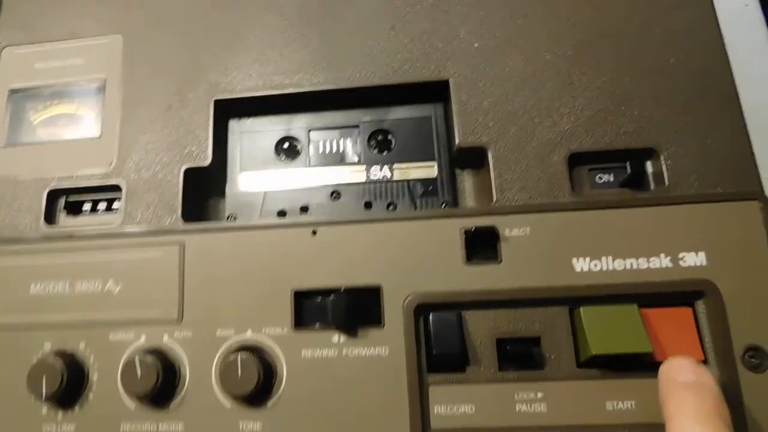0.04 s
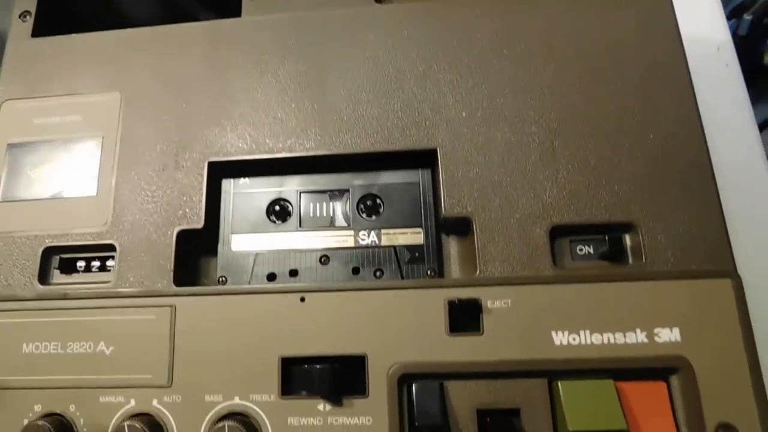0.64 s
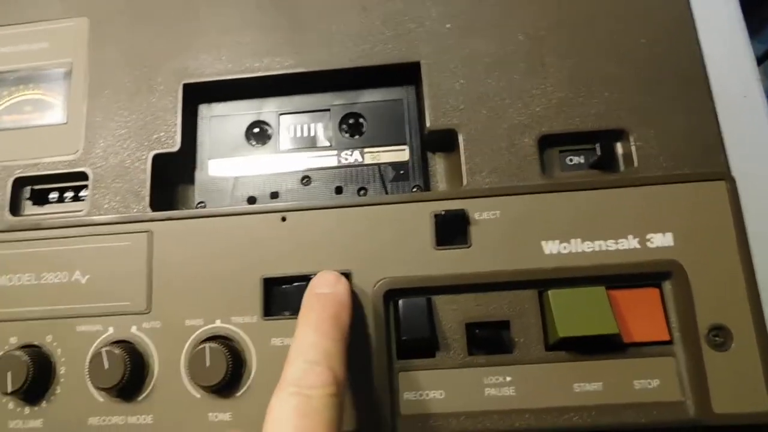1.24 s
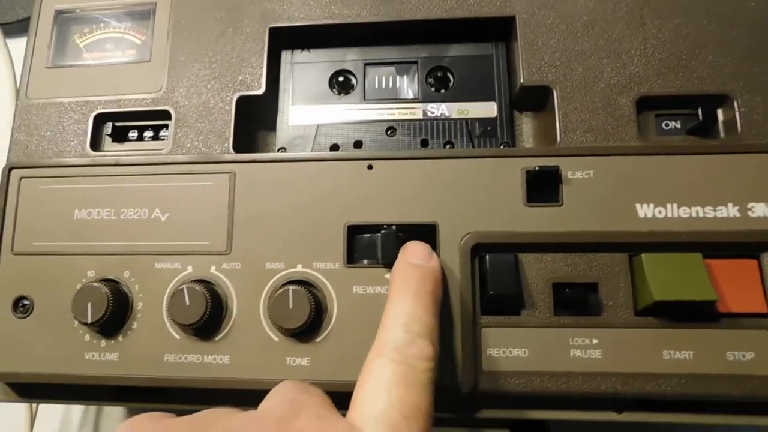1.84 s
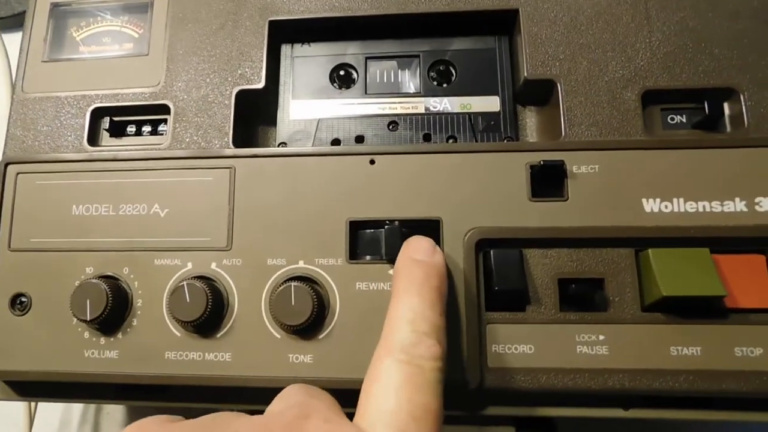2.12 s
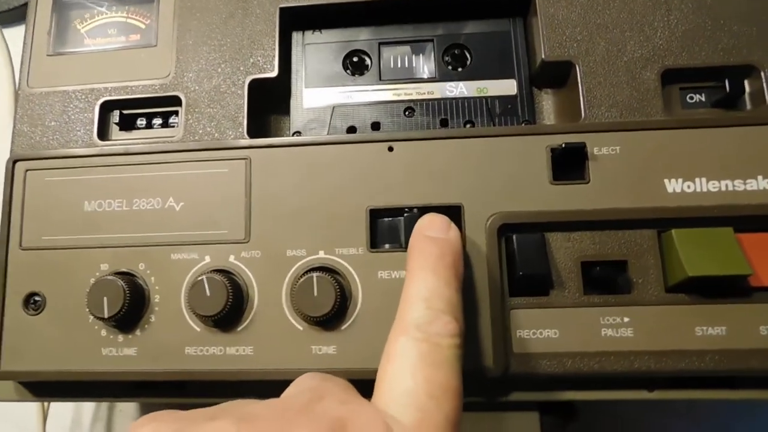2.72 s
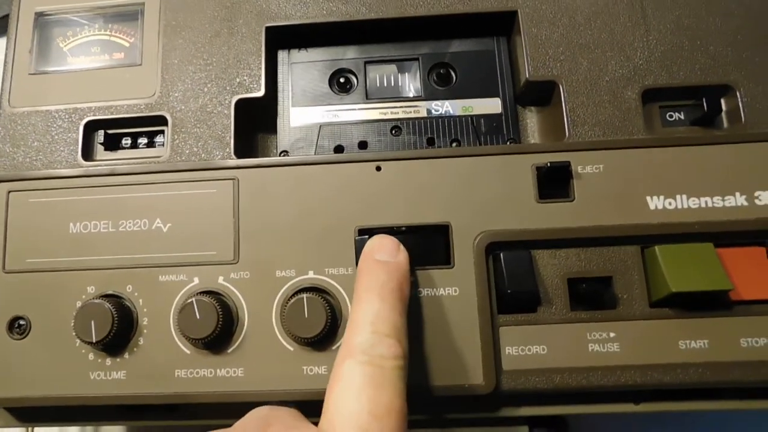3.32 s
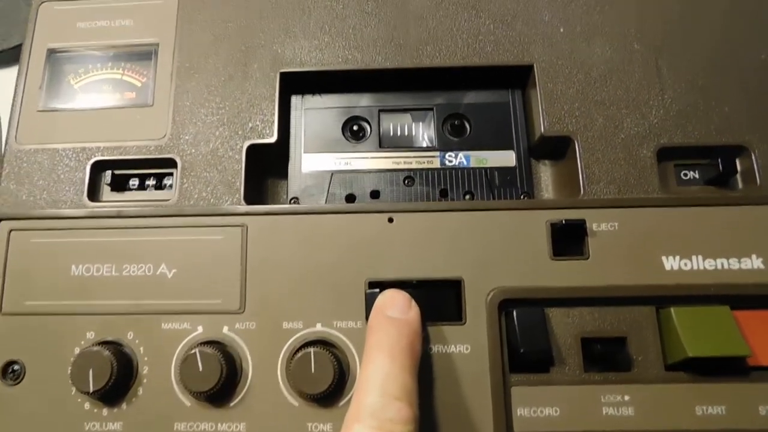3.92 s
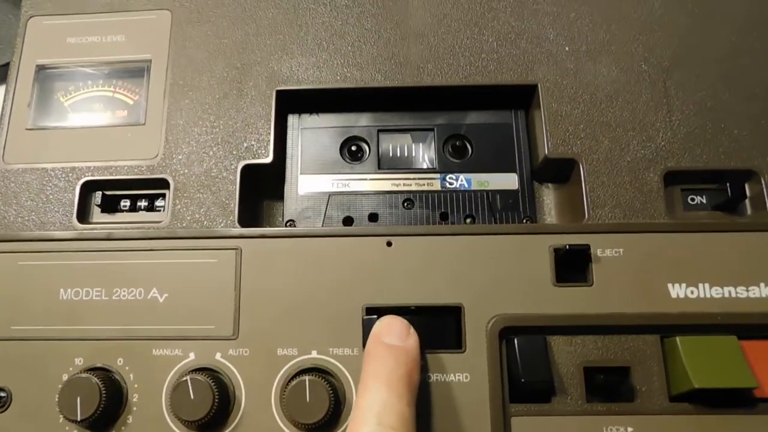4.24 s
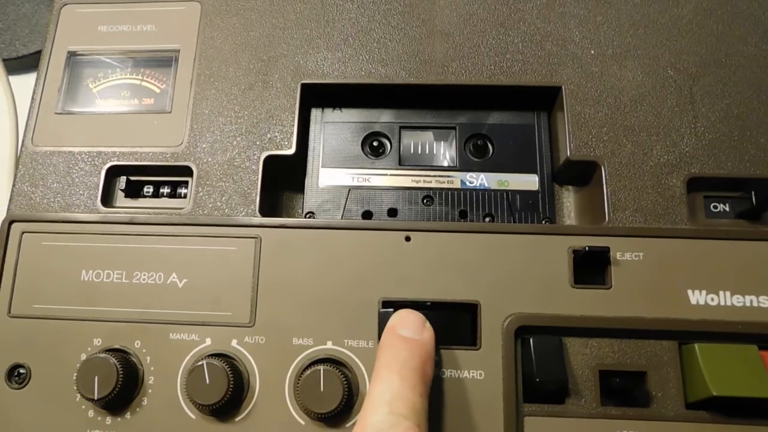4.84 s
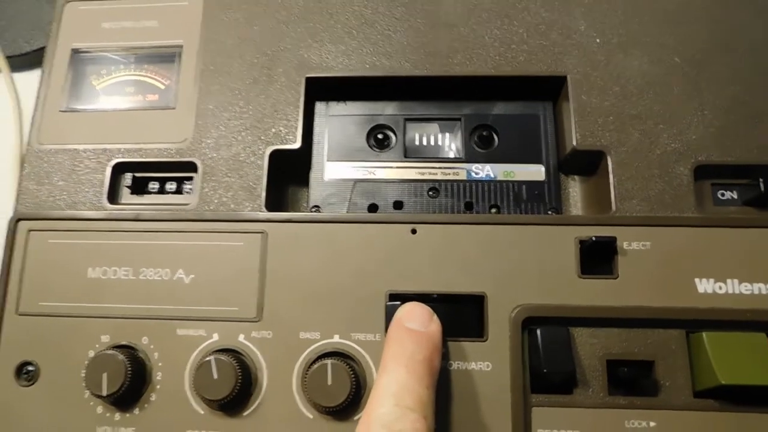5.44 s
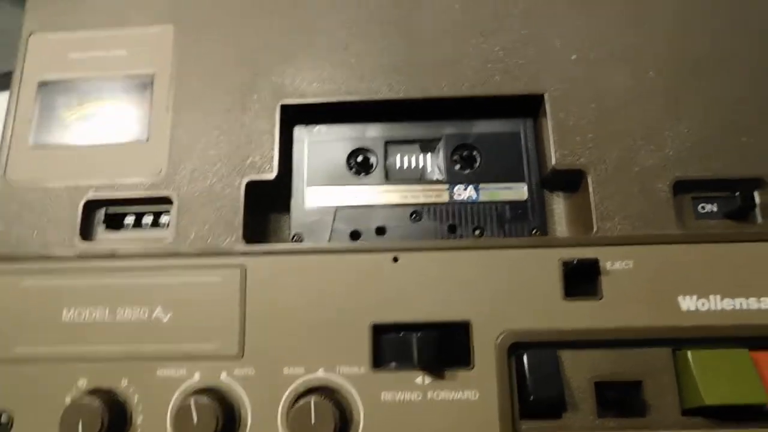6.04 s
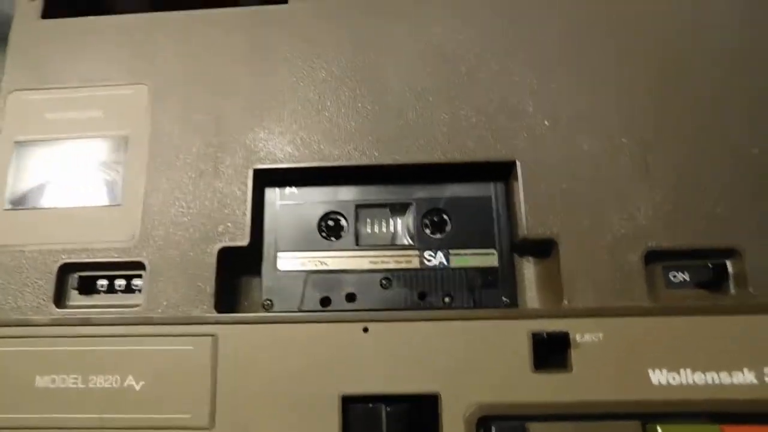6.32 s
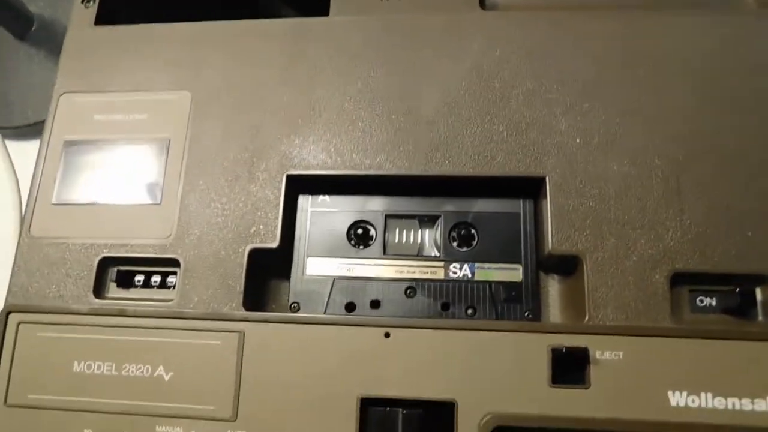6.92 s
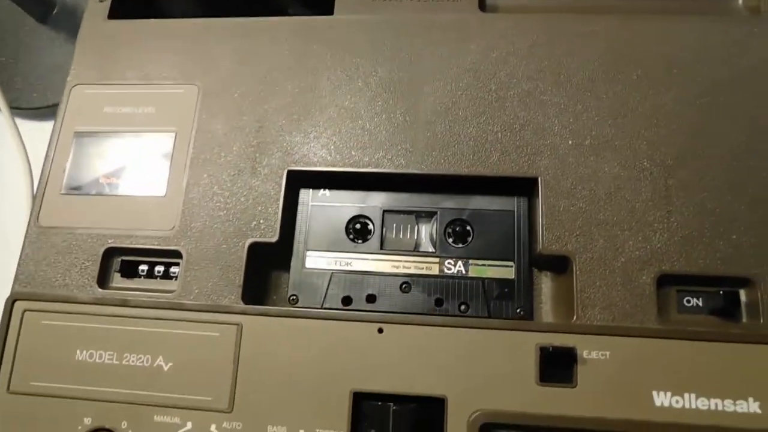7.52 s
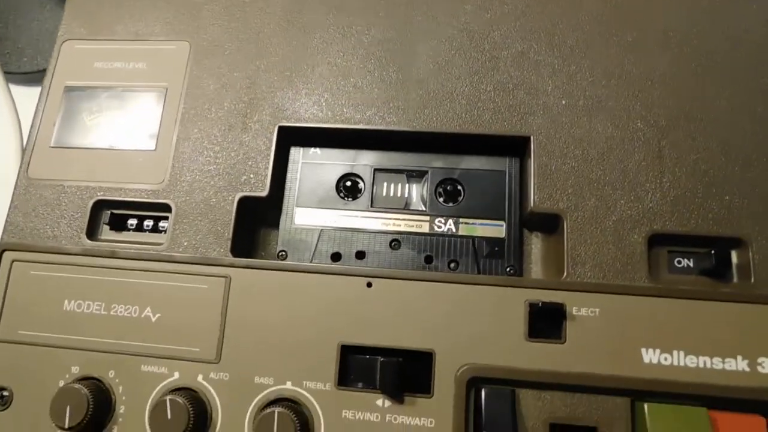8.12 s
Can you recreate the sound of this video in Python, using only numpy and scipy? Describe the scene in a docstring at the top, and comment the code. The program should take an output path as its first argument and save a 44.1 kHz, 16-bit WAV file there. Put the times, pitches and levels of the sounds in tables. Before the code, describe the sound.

Close to a cassette player in a small room, the motor hums and the drive knocks softly over faint hiss. After a few light clicks, a sharper one starts the rewind, and the reels spin up into a rasping whir for about two and a half seconds. A loud clack cuts it off as the slider is released, leaving steel springs ringing faintly over the idling mechanism.

```python
"""A cassette deck's wind slider clicks, is held in rewind, then snaps back with a loud clack.
Each contact rings the case and a small room; the clack leaves steel springs ringing.
During rewind the reels spin up, the spindle rubs and shakes the cassette shell, and the tape hisses.
Underneath, the motor hums and the drive knocks softly in the chassis, over a faint steady hiss."""
import sys
import numpy as np
from scipy import signal
from scipy.fft import rfft, irfft
from scipy.io import wavfile
from scipy.ndimage import uniform_filter1d, map_coordinates

SR = 44100
rng = np.random.default_rng(int(sys.argv[2]) if len(sys.argv) > 2 else 0)


def dump_mix(stems):
    """Bounce the given channels to the path in sys.argv[1] as a 16-bit WAV at rate SR."""
    frames = np.atleast_2d(stems).T  # one column per channel
    limited = np.clip(frames, -1, 1)  # hard clip at full scale
    pcm = np.round(limited * 32767).astype(np.int16)
    wavfile.write(sys.argv[1], SR, pcm)


N = 359856
TIME = np.arange(N) / SR
FREQS = np.maximum(np.arange(N // 2 + 1) * SR / N, 1)
SIDES = np.array([[1], [-1]])   # left, right
ENGAGE_S, RELEASE_S = 2.97, 5.519   # slider held in rewind
MOTOR_HZ = 27.657


def from_db(db):
    """Decibels to gain."""
    return 10 ** (np.asarray(db) / 20)


def unit_rms(x):
    """Scale to rms 1."""
    return x / np.sqrt(np.mean(x ** 2) + 1e-20)


def at_hz(points, hz):
    """Interpolate a table on a log-frequency axis."""
    known_hz, values = np.transpose(points)
    return np.interp(np.log(hz), np.log(known_hz), values)


def drift(rate_hz):
    """Smooth random wander, rms 1."""
    steps = rng.standard_normal(2048)
    curve = map_coordinates(steps, [TIME[::32] * rate_hz], order=3, mode="wrap")
    return unit_rms(curve).repeat(32)[:N]


def steady(x, window_samples):
    """Even out short-term power, so an envelope alone sets the loudness."""
    power = np.mean(x ** 2, axis=0)
    local_power = np.abs(uniform_filter1d(power, window_samples, mode="wrap"))
    return x * np.sqrt(power.mean() / (local_power + 1e-20))


def resonate(x, resonances):
    """Cascade of peaks and dips; overall rms is kept."""
    sections = []
    for hz, width_hz, lift_db in resonances:
        damping = np.pi * abs(width_hz) / SR
        tuning = -2 * np.cos(2 * np.pi * hz / SR)
        lifted = damping * from_db(lift_db)
        biquad = np.array([1 + lifted, tuning, 1 - lifted, 1 + damping, tuning, 1 - damping])
        sections.append(biquad / (1 + damping))
    return unit_rms(signal.sosfilt(sections, x)) * np.sqrt(np.mean(x ** 2))


def blow_power(times_s, powers, t60_s, rise_s):
    """Summed power envelope of blows that build up and decay."""
    total, age = np.zeros(N), TIME[:SR // 2]
    for start_s, power, ring_s in np.broadcast(times_s, powers, t60_s):
        shape = from_db(-60 * age / ring_s) * (1 - np.exp(-age / rise_s))
        span = total[max(round(start_s * SR), 0):][:len(age)]
        span += power * shape[:len(span)] ** 2
    return total


def case_highpass(x, lowest_mode_hz=205):
    """The small case radiates little below its lowest mode."""
    return signal.sosfilt(signal.butter(4, lowest_mode_hz, "high", fs=SR, output="sos"), x)


# microphone likeness: (frequency [Hz], coherence [0-1])
MIC_COHERENCE = [(40, 0.93), (130, 0.985), (370, 0.99), (600, 0.94), (1100, 0.87), (2200, 0.68),
                 (4000, 0.42), (9000, 0.4), (14000, 0.3)]
# microphone balance: (frequency [Hz], left minus right [dB])
MIC_BALANCE = [(300, 0.74), (1100, 1.6), (2200, 0), (4000, 0), (9000, -2.5), (14000, -1.7)]
def stereo_noise(spectrum, ripple_db=2.2, ripple_step_hz=70, left_lag_samples=1.72):
    """Coloured noise at two microphones: alike in the bass, less so in the treble."""
    mid, side = rfft(rng.standard_normal((2, N)))
    coherence = np.clip(at_hz(MIC_COHERENCE, FREQS), 0, 1)
    pair = np.sqrt(1 + coherence) * mid + SIDES * np.sqrt(1 - coherence) * side
    pair[0] *= np.exp(-2j * np.pi * FREQS * left_lag_samples / SR)
    ripple = np.interp(FREQS / ripple_step_hz, np.arange(1024), rng.standard_normal(1024))
    ripple *= np.clip(FREQS / 7000, 0, 1) ** 2   # crowded small modes ripple the treble
    colour_db = at_hz(spectrum, FREQS) + ripple_db * ripple + SIDES * at_hz(MIC_BALANCE, FREQS) / 2
    return unit_rms(irfft(pair * from_db(colour_db), N))


# hiss spectrum: (frequency [Hz], relative density [dB])
HISS_SPECTRUM = [(1000, 7), (4000, 3), (6500, -2), (9000, 0), (10700, 0.5), (12000, -0.5), (13200, -2),
                 (14200, -6), (16000, -11)]
# hiss resonances: (frequency [Hz], width [Hz], lift [dB])
HISS_PEAKS = [(7690, 30, 7), (8500, 270, 1), (9100, 170, -10), (9950, 240, 3), (10000, 200, -8),
              (10460, 500, 3.5)]
# hiss envelope: (time [s], level [dB])
HISS_LEVEL = [(0, -60.5), (1.5, -61.5), (2.2, -62.5), (8.16, -62)]
def hiss():
    """Faint, nearly steady background noise with treble resonances."""
    level_db = np.interp(TIME, *np.transpose(HISS_LEVEL))
    return from_db(level_db) * resonate(stereo_noise(HISS_SPECTRUM), HISS_PEAKS)


# motor and mains lines: (frequency [Hz], rms level [dB], waver depth [ratio])
HUM_LINES = [(27.7, -63, 0.14), (120, -62.5, 0.14), (180, -62.3, 0.14), (300, -57.7, 0.18), (334, -66, 0.6),
             (382, -70, 0.7), (2236, -75, 0.5)]
def motor_hum():
    """Shaft unbalance and mains harmonics, wavering in level and phase."""
    lines = 0
    for hz, db, waver in HUM_LINES:
        amplitude = np.sqrt(2) * from_db(db) * (1 + waver * drift(9))
        phase = 2 * np.pi * (hz * TIME + rng.random()) + waver * drift(6)
        lines += amplitude * np.sin(phase)
    return lines * from_db(SIDES * at_hz(MIC_BALANCE, MOTOR_HZ) / 2)


# bearing noise: (frequency [Hz], relative density [dB])
BEARING_SPECTRUM = [(20, -41), (50, -8.5), (130, -1.5), (210, -6), (350, -0.5), (470, -9.5), (800, -8),
                    (1300, -10), (2000, -14), (3100, -16.5), (3800, -26), (6000, -30), (15000, -46)]
# bump and knock noise: (frequency [Hz], relative density [dB])
THUD_SPECTRUM = [(150, -43), (350, -13), (550, -5.5), (800, 1.5), (1300, -11), (1700, -8), (2400, -24),
                 (5000, -55), (12000, -64)]
# distinct knocks: (time [s], level [dB])
KNOCKS = [(0.457, -46), (0.563, -41), (0.599, -37.5), (0.996, -39.5), (1.613, -46), (2.155, -41),
          (2.41, -37.5), (2.663, -46), (2.774, -38.5), (2.920, -41), (5.697, -37), (5.949, -37.5),
          (6.529, -39), (7.036, -46), (7.686, -46), (8.014, -44)]
# chassis resonances: (frequency [Hz], width [Hz], lift [dB])
CHASSIS_PEAKS = [(254, 37, 3.5), (407, 29, 5), (516, 18.5, 7), (643, 16, 4.5), (684, 47, 7.5),
                 (750, 21, -8), (766.5, 18.5, 9.5), (890, 44, 5.5), (1042, 54, 4.5), (1294, 35, 8),
                 (1608, 30, 7), (1820, 33, -1)]
def drive(bearing_db=-51, bump_db=-46, swing_db=4.2, scatter_db=2, flywheel_hz=9.51, tight_s=0.0367):
    """Bearing noise, one bump per motor turn and some harder knocks ring in the chassis."""
    turns_s = np.arange(0.0214, TIME[-1], 1 / MOTOR_HZ)
    belt_slip_turns = np.interp(turns_s, [ENGAGE_S, RELEASE_S], [0, 0.71])
    flywheel_turns = flywheel_hz * (turns_s - tight_s) - belt_slip_turns
    tightness = np.cos(2 * np.pi * flywheel_turns)   # 1 at the flywheel's tight spot
    bumps_db = bump_db + swing_db * tightness + scatter_db * rng.uniform(-0.3, 1, len(turns_s))
    times_s, levels_db = np.vstack([np.column_stack([turns_s, bumps_db]), KNOCKS]).T
    power = blow_power(times_s, from_db(levels_db) ** 2, t60_s=0.05, rise_s=0.0035)
    thuds = steady(stereo_noise(THUD_SPECTRUM), window_samples=220) * np.sqrt(power)
    bearing = from_db(bearing_db) * stereo_noise(BEARING_SPECTRUM)
    return resonate(bearing + thuds, CHASSIS_PEAKS)


# reel whir: (frequency [Hz], relative density [dB])
WHIR_SPECTRUM = [(100, -20), (330, 0.5), (520, -13.5), (730, 0.5), (1400, -6), (2250, -7.5), (2700, -5),
                 (3600, -7), (4400, -11), (4900, -9), (5600, -12), (8500, -16.5), (11000, -19.5),
                 (15500, -20)]
# cassette shell resonances: (frequency [Hz], width [Hz], lift [dB])
SHELL_PEAKS = [(690, 50, 3), (772, 30, 3), (850, 60, 3), (1070, 25, 5), (1120, 50, -4), (1190, 30, 8),
               (1520, 25, 6), (1585, 50, -5), (1732, 34, 14), (1835, 40, 6), (1910, 70, -7), (2060, 50, 10),
               (2160, 110, -7), (2410, 60, 6.5), (2525, 70, 10), (2660, 40, 9), (2800, 80, 9),
               (3040, 60, -3), (3140, 55, 9), (3455, 65, 8), (3620, 80, -5), (3795, 95, 14.5),
               (4150, 90, 5), (4600, 90, 9), (4840, 140, -11), (5450, 110, 9), (5760, 120, 6),
               (6100, 80, 4), (6330, 100, -3), (6560, 130, 6), (6980, 100, 10.5), (7683, 60, 3),
               (8890, 130, 10.5)]
def reel_whir(rub, speed_ratio, full_db=-42, db_per_doubling=11.5, pan_db=-2, dull_hz=2600):
    """The rubbing spindle shakes the shell, louder and brighter with speed; it coasts, then brakes."""
    coast_s, brake_db_per_s = 0.047, 480
    rasp = resonate(stereo_noise(WHIR_SPECTRUM) * unit_rms(rub), SHELL_PEAKS)
    rasp = steady(rasp, window_samples=1200)
    dull = irfft(rfft(rasp) / np.sqrt(1 + (FREQS / dull_hz) ** 6), N)
    treble_share = speed_ratio ** 4.7
    brake_db = brake_db_per_s * np.maximum(TIME - RELEASE_S - coast_s, 0)
    level_db = full_db + db_per_doubling * np.log2(speed_ratio) - brake_db + SIDES * pan_db / 2
    return from_db(level_db) * (treble_share * rasp + (1 - treble_share) * dull)


# running tape: (frequency [Hz], relative density [dB])
TAPE_SPECTRUM = [(60, -34), (100, -4), (135, -1), (200, -3), (370, -1), (520, -8.5), (1500, -5),
                 (4500, -21), (7500, -14), (11000, -13.5), (13500, -12), (15500, -17)]
# tape drive resonances: (frequency [Hz], width [Hz], lift [dB])
TAPE_PEAKS = [(133.5, 8.5, 8.5), (274, 20, 3.5), (377.5, 8.7, 13), (9500, 400, -4), (10500, 400, 3.5),
              (11400, 400, 4.5), (13000, 500, 1)]
def running_tape(rub, level_db=-48, brake_db_per_s=270):
    """Tape rumble and hiss, pulsing with the spindle and braked on release."""
    brake_db = brake_db_per_s * np.maximum(TIME - RELEASE_S, 0)
    noise = resonate(stereo_noise(TAPE_SPECTRUM), TAPE_PEAKS)
    return from_db(level_db - brake_db) * noise * unit_rms(np.sqrt(rub))


def rewind(catch_hz=43, full_hz=108.2, spin_up_s=1.35, clutch_s=0.017):
    """The clutch bites and the spindle eases up to full speed, rubbing in step with its turns."""
    held_s = TIME - ENGAGE_S
    spindle_hz = full_hz - (full_hz - catch_hz) * (1 - np.clip(held_s / spin_up_s, 0, 1)) ** 2
    angle = 2 * np.pi * np.cumsum(spindle_hz) / SR
    rub = 1 + sum(depth * np.cos(k * angle) for k, depth in [(1, .28), (2, .25), (4, .19), (6, .17)])
    clutch = np.clip(held_s / clutch_s, 1e-6, 1)
    return clutch * (reel_whir(rub, spindle_hz / full_hz) + running_tape(rub))


def struck(modes, start_s, rise_s=0.0018):
    """Decaying sine modes set off by one blow."""
    age = np.maximum(TIME - start_s, 0)
    tones = sum(from_db(db - 60 * age / t60) * np.sin(2 * np.pi * hz * age) for hz, db, t60 in modes)
    return tones * (1 - np.exp(-age / rise_s))


# low body modes: (frequency [Hz], relative level [dB], t60 [s])
BODY_MODES = [(220, -9, 0.12), (349, -3, 0.14), (410, -5, 0.096), (623, 0, 0.14)]
# heavy blows: (time [s], level [dB])
BODY_BLOWS = [(1.143, -40.5), (1.709, -42), (1.788, -51), (5.504, -34), (5.521, -32)]
def body_thumps():
    """Heavy blows reach the low modes of the deck's body."""
    return sum(from_db(db) * struck(BODY_MODES, start_s) for start_s, db in BODY_BLOWS)


# wind lever modes: (frequency [Hz], relative level [dB], t60 [s])
LEVER_MODES = [(1140, -31, 0.081), (1690, -1, 0.037), (2050, -9, 0.037), (3580, -4, 0.024)]
# lever drops: (time [s], level [dB])
LEVER_DROPS = [(2.97, -24.5), (2.995, -37)]
def lever():
    """The wind lever rings briefly as it drops into gear."""
    return sum(from_db(db) * struck(LEVER_MODES, start_s) for start_s, db in LEVER_DROPS)


# stop key spring: (frequency [Hz], level [dB], t60 [s])
STOP_SPRING_MODES = [(694, -48.5, 2.2), (1039, -51.5, 0.8), (1389, -55.5, 1.9)]
# slider end stop (short) and return spring (long): (frequency [Hz], level [dB], t60 [s])
RETURN_MODES = [(778, -25, 0.12), (1050, -28, 0.07), (1297, -31, 0.17), (1610, -35, 0.21),
                (2030, -23, 0.08), (2592, -26, 0.1), (3280, -27, 0.07), (1039, -48, 0.5),
                (1502, -50.5, 1.6), (1733, -52, 0.7), (2239, -52, 0.6), (2375, -51.5, 0.6),
                (3521, -56, 0.8)]
def springs():
    """Thin steel tones: the stop key's spring at the start, end stop and return spring on release."""
    return struck(STOP_SPRING_MODES, 0) + struck(RETURN_MODES, RELEASE_S)


# struck case: (frequency [Hz], relative density [dB])
CASE_SPECTRUM = [(100, -50), (200, -11), (350, -6.5), (500, -5.5), (750, -4), (1300, 2), (2400, -0.5),
                 (3900, -6.5), (6500, -9.5), (11000, -6), (15500, -17)]
def case_octaves():
    """The case's dense modes as steady noise bands: (centre [Hz], signal)."""
    spectrum, octaves = rfft(stereo_noise(CASE_SPECTRUM)), []
    for hz in 125 * 2. ** np.arange(8):
        weight = np.clip(1 - np.abs(np.log2(FREQS / hz)), 0, 1)
        band = irfft(spectrum * weight, N)
        octaves.append((hz, steady(band, window_samples=int(SR * (0.002 + 2 / hz)))))
    return octaves


def contacts(clicks, rebound_s=0.015):
    """Each click is a light touch, the blow itself and one duller rebound."""
    time_s, db, tilt, ring, lead_s = np.transpose(clicks)
    touch = [time_s - lead_s, db - 12, tilt - 3.5, ring]
    blow = [time_s, db, tilt, ring]
    rebound = [time_s + rebound_s, db - 23, tilt - 5, ring * 1.2]
    return np.hstack([touch, blow, rebound])


# case decay: (frequency [Hz], t60 [s])
CASE_T60 = [(200, 0.062), (1000, 0.097), (3000, 0.077), (12000, 0.032)]
# small room decay: (frequency [Hz], t60 [s])
ROOM_T60 = [(300, 0.47), (1500, 0.26), (5000, 0.28), (12000, 0.16)]
def strike_case(octaves, clicks, resonances, gain_db, rise_cycles, room_db=-22):
    """Each contact rings the case, lows building more slowly, and the room answers."""
    times_s, db, tilt, ring = contacts(clicks)
    sound = 0
    for hz, band in octaves:
        power = from_db(db + gain_db + tilt * np.log2(hz / 2000)) ** 2
        direct = blow_power(times_s, power, ring * at_hz(CASE_T60, hz), rise_s=rise_cycles / hz)
        room = blow_power(times_s, power * from_db(room_db) ** 2, at_hz(ROOM_T60, hz), rise_s=0.006)
        sound += band * np.sqrt(direct + room)
    return resonate(case_highpass(sound), resonances)


# slider and latch clicks: (time [s], relative level [dB], tilt [dB/oct], t60 [factor], touch lead [s])
CLICKS = [(1.1404, -26.5, -1, 0.85, 0.0017), (1.6922, -52, 3.5, 0.6, 0.001),
          (1.7062, -34, 0.9, 0.73, 0.002), (1.7850, -35, 0, 0.7, 0.0096), (1.790, -40, -7, 0.9, 0.002),
          (1.857, -50.5, -9, 0.92, 0.002), (2.948, -43, -2, 1.1, 0.002),
          (2.9703, -36.5, -1.3, 0.98, 0.0015), (2.993, -39, -2.5, 0.99, 0.002),
          (3.009, -38.5, -1.3, 1.1, 0.002), (6.524, -56, -3, 1.2, 0.003), (7.3577, -46.5, -3, 1.2, 0.001)]
# slider bracket resonances: (frequency [Hz], width [Hz], lift [dB])
BRACKET_PEAKS = [(340, 70, -5), (476, 60, -2), (620, 30, 5), (775, 31, 4.5), (910, 37, 2), (1016, 27, 4),
                 (1190, 50, 2), (1380, 35, 3), (1603, 53, 7), (1750, 45, 2.5), (2620, 82, 5.5),
                 (3530, 110, 7)]
# slam and chatter: (time [s], relative level [dB], tilt [dB/oct], t60 [factor], touch lead [s])
SLAM = [(5.517, -13, 1.0, 0.97, 0.015), (5.522, -16.5, 3, 0.95, 0.016), (5.5288, -21, 3.5, 0.72, 0.003),
        (5.535, -13.5, -2.5, 0.44, 0.0045), (5.547, -32, 3, 1.5, 0.002)]
# panel resonances: (frequency [Hz], width [Hz], lift [dB])
PANEL_PEAKS = [(240, 40, 2), (395, 70, 6), (520, 70, -5), (625, 45, 6), (778, 30, 12), (950, 60, 3),
               (1055, 40, 9), (1240, 45, 7), (1605, 60, 5), (2030, 60, 8), (2590, 45, 8), (3275, 45, 7),
               (4050, 300, -5), (4540, 80, 6), (6940, 50, 7), (10500, 45, 9)]
def slider():
    """Light clicks ring in the bracket; on release the slider slams home and shakes the whole panel."""
    octaves = case_octaves()
    clicks = strike_case(octaves, CLICKS, BRACKET_PEAKS, gain_db=3.5, rise_cycles=2.6)
    slam = strike_case(octaves, SLAM, PANEL_PEAKS, gain_db=2, rise_cycles=1)
    return clicks + slam


def scene():
    """Stereo mix of the deck over faint hiss."""
    ringing = case_highpass(body_thumps() + lever() + springs())
    return hiss() + motor_hum() + drive() + rewind() + ringing + slider()


def record(dry, ceiling=0.47, cutoff_hz=15850):
    """Soft clip, then a steep low-pass."""
    rounded = ceiling * np.tanh(dry / ceiling)
    return signal.sosfilt(signal.ellip(12, .1, 80, cutoff_hz, fs=SR, output="sos"), rounded)


dry = scene()
out = record(dry)
dump_mix(out)
```